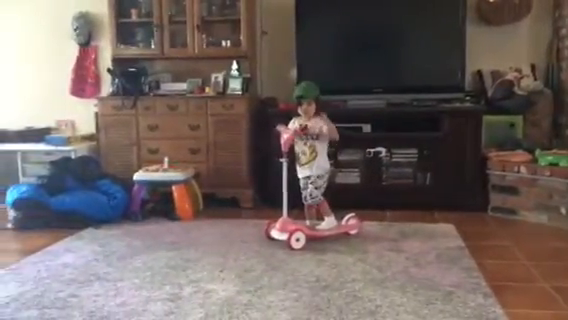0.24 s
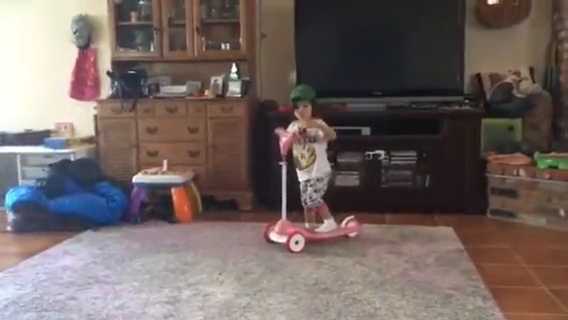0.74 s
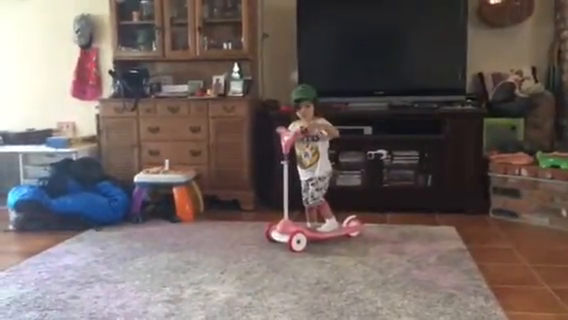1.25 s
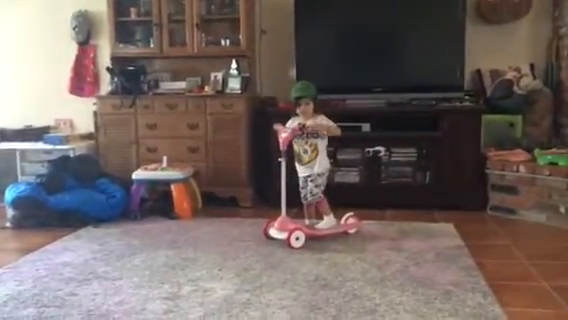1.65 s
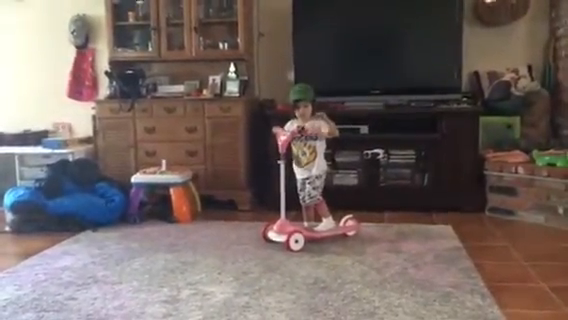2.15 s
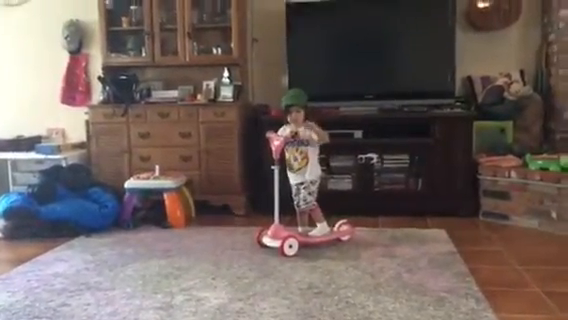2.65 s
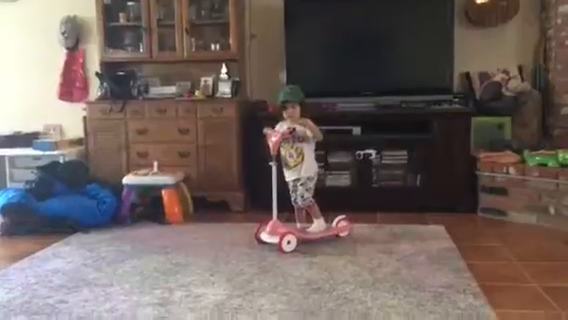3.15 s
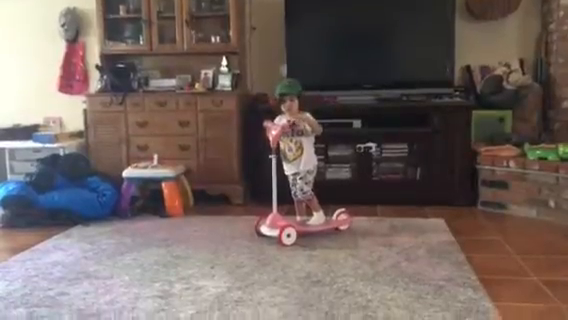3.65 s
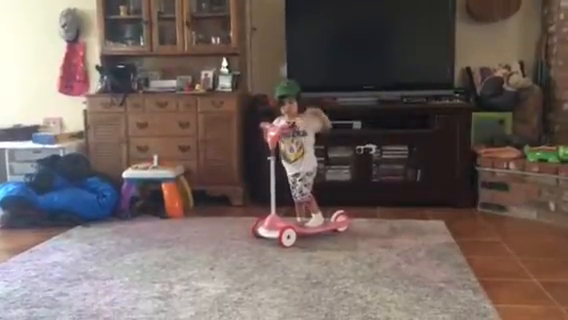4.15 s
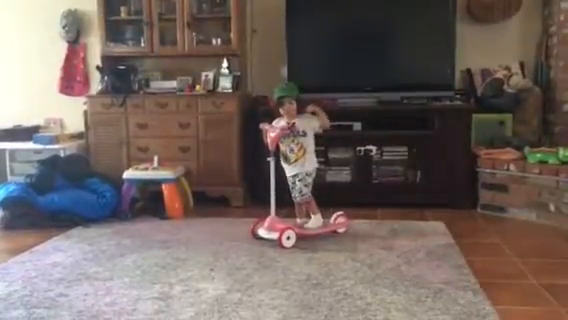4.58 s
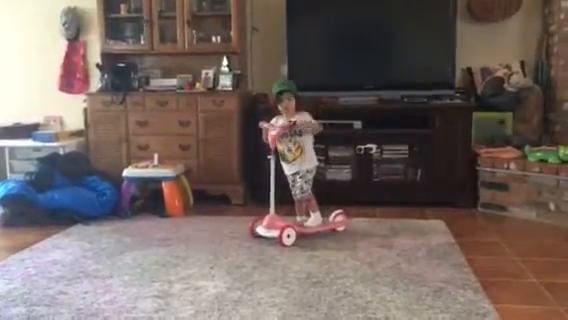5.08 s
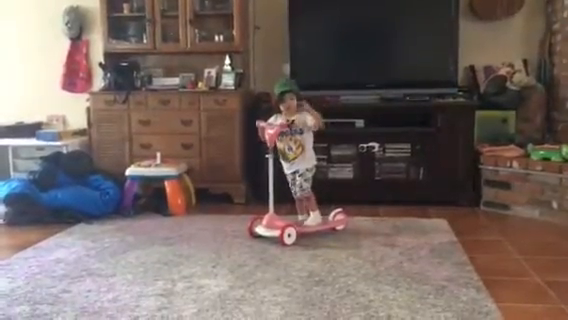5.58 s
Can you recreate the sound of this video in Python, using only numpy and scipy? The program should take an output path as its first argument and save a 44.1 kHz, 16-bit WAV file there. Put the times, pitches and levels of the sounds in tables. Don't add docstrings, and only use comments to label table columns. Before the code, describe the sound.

Two clear, high bell dings a couple of seconds apart, with lever clicks and long shimmering decay over faint room hum and hiss.

```python
import sys
import numpy as np
from scipy import signal
from scipy.io import wavfile
from scipy.ndimage import uniform_filter1d

SR = 44100
rng = np.random.default_rng(int(sys.argv[2]) if len(sys.argv) > 2 else 0)


def invert_db(x):
    u = np.asarray(x, float) / 20
    return 10 ** u


def digitize_waveform(pressure):
    field = np.atleast_2d(pressure).T
    bounded = np.clip(field, -1, 1)
    quanta = np.round(bounded * 32767).astype(np.int16)
    wavfile.write(sys.argv[1], SR, quanta)


N = 256662


def evened(x):
    return x / np.sqrt(np.mean(x ** 2) + 1e-20)


def read(points, hz):
    f, value = np.transpose(points)
    return np.interp(np.log(hz + 1), np.log(f + 1), value)


def add(mix, s, sound):
    part = mix[round(s * SR):][:len(sound)]
    part += sound[:len(part)]


def colour(points, size=1024):
    level_db = np.maximum(read(points, np.fft.rfftfreq(size, 1 / SR)), -70)
    half = np.log(invert_db(level_db))
    full = np.concatenate([half, half[-2:0:-1]])
    taps = np.fft.ifft(np.exp(np.conj(signal.hilbert(full)))).real
    return taps / np.linalg.norm(taps)


def burst(db, ms, count=16, size=2048):
    r = np.exp(-2000 / ms / SR)
    bend = -2 * r * np.cos(np.pi * rng.random(count) ** 1.6)
    one = np.ones(count)
    stages = np.column_stack([r * r * one, bend, one, one, bend, r * r * one])
    click = np.arange(size) == 0
    return 2.84 * invert_db(db) * signal.sosfilt(stages, click)


def wander(top_hz, count=24):
    t = np.arange(0, N, 64) / SR
    slow = 0
    for f in np.geomspace(.3, top_hz, count):
        slow = slow + np.sin(2 * np.pi * (f * t + rng.random())) / np.sqrt(f)
    return np.interp(np.arange(N) / SR, t, evened(slow))


def noise(points, patchy_db):
    frames, hz = N // 512 + 5, np.fft.rfftfreq(2048, 1 / SR)
    a, b, patches = rng.standard_normal((frames, 1025, 3)).T
    patches = uniform_filter1d(patches, size=12, axis=0)
    patches = evened(uniform_filter1d(patches, size=8, axis=1))
    z = (a + 1j * b) * invert_db(read(points, hz)[:, None] + patchy_db * patches)
    return evened(signal.istft(z, nperseg=2048, noverlap=1536)[1][:N])


BELL_HZ = [2438.7, 2469.0, 6261.4, 11359.6]
# mode, mode, first blow level/dB, second blow level/dB
SUMS = [(1, 1, -77.5, -72.5), (0, 1, -84, -80), (0, 2, -63, -65), (1, 2, -59.5, -57.5), (2, 2, -60, -75),
        (1, 3, -56, -58.5)]
BEAT_LEAD = [-0.051, .09]


def bell():
    t = np.arange(N) / SR
    second = t >= BLOWS[1][0]
    since = np.where(second, t - BLOWS[1][0], t - BLOWS[0][0])
    out = np.zeros(N)
    first_share = [.2, 0.22, 0.38, 0.82]
    levels = [np.interp(t, t[::8], heard(k, t[::8])) / 1.104 for k in range(len(BELL_HZ))]
    lead = np.where(second, BEAT_LEAD[1], BEAT_LEAD[0])
    echoed = 0.47 * (since > ECHOES[2][0]) + 0.67 * (since > ECHOES[3][0])
    for hz, level, share, turns in zip(BELL_HZ, levels, first_share, [-lead, 0, 0, 0]):
        fill = uniform_filter1d(share + (1 - share) * echoed, size=30)
        spin = np.exp(2j * np.pi * (hz * since + turns))
        out += np.sqrt(2) * (level * fill * spin).imag

    swing = [abs(level) / invert_db(db) for level, db in zip(levels, RINGS[0])]
    swing[2] = invert_db(-60 * np.maximum(since, 0) / FREE_T60[2])
    grip_s = 4.95
    free = (since > 0) * np.clip((grip_s - t) / .02, 0, 1)
    for a, b, first_db, second_db in SUMS:
        a, b = round(a), round(b)
        bend = invert_db(np.where(second, second_db, first_db) + 4.0 * wander(25.0))
        bend = bend * swing[a] * swing[b] * free
        out += np.sqrt(2) * bend * np.sin(2 * np.pi * (BELL_HZ[a] + BELL_HZ[b]) * since)
    return out


FREE_T60 = [4.68, 5.02, 3.21, 1.036]
# low twin level/dB, low level/dB, main level/dB, top level/dB
RINGS = [
    (-46, -42, -23, -20),
    (-44, -43, -26, -23),
]
# main level/dB, top level/dB
KNOCK_RING = (-41, -54.5)
# share, turns behind at rest, swell of the ring t/s
ARM = [(.421, 0.097, 0.0086), (1.3, -0.035, .08), (1.284, 0.051, .002), (0.26, 0.56, .0006)]
# t/s, path/mm
ARM_PATH = [
    [(1.701, 11), (2.022, -13.5), (2.418, -6.5), (2.938, 9), (3.614, 20.5), (4.072, 13)],
    [(4.081, -23), (4.154, 15), (4.244, 24.5), (4.27, 26.5), (4.338, 23), (4.468, 14.5), (4.562, 22),
     (4.838, 24.5), (5.008, 21)],
    [(5.092, 26.5), (5.144, 22.5), (5.182, 50), (5.322, 41), (5.386, 25.2), (5.472, 19.8), (5.562, 18.4),
     (5.778, 14.7)],
]
# t/s, path/mm
CHEST_PATH = [
    [(1.75, 11.8), (1.81, 31), (2.02, 44), (2.373, 34), (2.83, 23.5), (3.17, -39.5), (3.58, -21),
     (4.07, -34)],
    [(4.09, 77), (4.17, 47.4), (4.338, 51.7), (4.5, 33), (4.98, 32.0), (5.052, 23)],
    [(5.204, 83), (5.274, 87), (5.348, 64), (5.475, 62.4), (5.606, 54), (5.817, 51)],
]
# offset f/Hz, level/dB, 60 dB decay t/s
TWINS = [(-1.32, -7, 2.6), (11.4, 5, .3)]
TWIN_LEAD = [(0.85, .72), (.32, 0.36), (0.7, .5)]
# main level/dB, top level/dB
TWIN_PUSH_DB = [(0, -1.5), (0, 2), (0, -1)]
TWIN_SWELL_S = [.004, .03]
SOUND_MM_PER_S = 343000


def heard(k, t):
    starts = np.array([BLOWS[0][0], BLOWS[1][0], CLACKS[7][0]])
    ring = np.maximum(np.searchsorted(starts, t, "right") - 1, 0)
    path_mm = np.interp(t, *np.vstack(CHEST_PATH if k < 2 else ARM_PATH).T)
    if k < 2:
        ring = np.minimum(ring, 1)
    since = np.maximum(t - starts[ring], 0)
    share, turns, swell_s = ARM[k]
    copy = share * np.exp(2j * np.pi * (BELL_HZ[k] * path_mm / SOUND_MM_PER_S + turns))
    gain = invert_db(-60 * since / FREE_T60[k]) * (1 + copy)
    level_db = np.array([RINGS[0][k], RINGS[1][k], KNOCK_RING[k % 2]])[ring]
    if k >= 2:
        offset_hz, db, t60 = TWINS[k - 2]
        push_db = np.array(TWIN_PUSH_DB)[ring, k - 2]
        lead = np.array(TWIN_LEAD)[ring, k - 2]
        twin = (1 - np.exp(-since / TWIN_SWELL_S[k - 2])) * invert_db(db + push_db - 60 * since / t60)
        gain = abs(gain + twin * np.exp(2j * np.pi * (offset_hz * since + lead)))
    return invert_db(level_db) * gain * (1 - np.exp(-since / swell_s))


# t/s, crack level/dB
BLOWS = [
    (1.6831, -1.5),
    (4.0832, -4.5),
]
# f/Hz, level/dB per Hz
CRACK = [(590, -67.5), (1000, -30.5), (1700, -40.5), (2910, -22.5), (4540, -18.5), (6020, -12.5),
         (8860, -6.5), (11700, -5), (13500, -6), (16500, -31)]


def hammer():
    dry = np.zeros(N)
    for s, db in BLOWS:
        rattle = burst(db - 9.5, 2.9)
        rattle[0] = invert_db(db)
        add(dry, s, rattle)
    return signal.oaconvolve(dry, colour(CRACK))[:N]


# t/s, housing level/dB, stem level/dB, length/ms
CLACKS = [(0.0967, -59, -36.5, 1.85), (0.0973, -36.5, -53.5, 1.3), (1.6726, -27, -52, 3),
          (1.6805, -46, -50.5, 0.66), (1.684, -32.5, -37.5, 1.5), (4.0788, -42.5, -54.5, 0.92),
          (4.0851, -27, -46, 1), (5.0528, -33.5, -37.5, 1.3), (5.0626, -59, -45.5, 1.3),
          (5.07, -55, -42.5, 0.32), (5.126, -46.5, -45, 4.6), (5.145, -51, -72, 6.9)]
# f/Hz, level/dB per Hz
CLACK = [(180, -59.5), (300, -35.5), (1020, -8.5), (1550, -14), (2400, -5), (5100, -14), (9490, -14),
         (10700, -28), (11600, -14.5), (15400, -18), (16500, -36.5)]
# f/Hz, level/dB per Hz
KNOCK = [(150, -22.5), (300, 2.5), (550, 7), (1200, -8), (2000, -5.5), (5000, -12.5), (10000, 2),
         (15000, -12.5), (16500, -25.5)]


def lever():
    housing, stem = np.zeros((2, N))
    for s, housing_db, stem_db, ms in CLACKS:
        add(housing, s, burst(housing_db, ms))
        add(stem, s, burst(stem_db, ms))
    return (signal.oaconvolve(housing, colour(CLACK)) + signal.oaconvolve(stem, colour(KNOCK)))[:N]


# t/s, peak level/dB, f/Hz, length/ms
THUDS = [(.099, -46.5, 510, 15), (0.0985, -48.5, 11900, 3), (.1, -43, 2406, 12), (.101, -56, 3350, 8),
         (.431, -55, 655, 15), (1.675, -52.5, 1100, 6.3), (1.685, -31, 2364, 22), (1.686, -47, 555, 17),
         (4.086, -52, 1060, 7.4), (4.087, -28.5, 2364, 6.2), (4.088, -55, 309, 15),
         (1.688, -54.5, 300.5, 13), (4.729, -63, 1924, 28), (4.971, -57, 700, 10.4),
         (5.06, -37.5, 2380, 13), (5.15, -53, 760, 21)]
# t/s, peak level/dB, f/Hz, length/ms
TICKS = [(.070, -66, 3420, 4.4), (.98, -69, 3280, 3.1), (1.17, -58, 13000, 8), (1.212, -67.5, 3500, 2.2),
         (1.599, -63, 3330, 1.435), (2.215, -65, 4300, 4), (2.222, -60, 3500, 6), (2.231, -65.5, 1603, 3.7),
         (2.815, -62, 3680, 7.9), (2.85, -63, 3700, 23), (3.345, -63.5, 3450, 4), (3.42, -69.5, 1500, 10),
         (4.312, -55, 7500, 1.7), (4.312, -64, 3600, 2), (4.351, -56, 4280, 4), (4.352, -53.5, 8000, 2.7),
         (5.143, -57.5, 4340, 8), (5.269, -65, 3500, 3), (5.276, -51, 4370, 5), (5.301, -67, 4300, 4),
         (5.51, -54.5, 11300, 4)]


def thuds_and_ticks():
    near, far = np.zeros((2, N))
    rows = [(*row, 364, 0.94) for row in THUDS]
    rows += [(*row, .16 * row[2], .06 + .025 * row[3]) for row in TICKS]
    for s, db, hz, ms, width_hz, wet in rows:
        b, a = signal.iirpeak(min(hz, 15000), max(hz / width_hz, .7), SR)
        puff = signal.lfilter(b, a, burst(0, ms))
        puff = signal.lfilter(b, a, puff)
        puff *= invert_db(db) / abs(puff).max()
        wet = min(wet, 1)
        add(near, s, (1 - wet) * puff)
        add(far, s, wet * puff)
    return near, far


# t/s, level/dB
RUSTLE = [
    (1.75, -77),
    (1.9, -78),
    (2.05, -70.5),
    (2.19, -72.5),
    (2.21, -108.5),
]
# f/Hz, level/dB per Hz
CLOTH = [(300, -23.5), (700, 3), (2000, -2), (4500, -1), (7000, -14.5)]


def sleeve():
    s, db = np.transpose(RUSTLE)
    level_db = np.interp(np.arange(N) / SR, s, db, left=-140, right=-140)
    return invert_db(level_db) * noise(CLOTH, patchy_db=0.5)


# delay t/s, gain
ECHOES = [(.0023, .12), (.0048, -.12), (.0080, .4), (.0128, .2), (.0165, -.12), (.022, .1), (.0335, .15)]
# f/Hz, t/s
ROOM_T60 = [(200, 0.52), (600, 0.55), (1500, 0.45), (2500, 0.4), (5000, .4), (10000, 0.22), (16000, 0.095)]


def room(x):
    taps = np.zeros(SR // 2 * 2)
    at = np.arange(300, len(taps) - 20, 6)
    taps[at + rng.integers(0, 6, len(at))] = rng.choice([-1., 1.], len(at))
    hz, t, z = signal.stft(taps, SR, nperseg=256)
    z = z * invert_db(-60 * t / read(ROOM_T60, hz)[:, None])
    tail = signal.istft(z, SR, nperseg=256)[1]
    tail *= 1 - np.exp(-np.arange(len(tail)) / (0.0013 * SR))
    tail = invert_db(-1.5) * tail / np.linalg.norm(tail)
    tail[0] = 1
    for delay, gain in ECHOES:
        tail[round(delay * SR)] += gain
    return signal.fftconvolve(x, tail)[:N]


# f/Hz, level/dB
HUM = [(59.2, -70.5), (118.4, -74), (172.3, -73.5), (258.4, -80), (296.1, -78.5), (355.3, -81.5),
       (414.5, -87)]
# f/Hz, level/dB per Hz
RUMBLE = [(12, -42), (20, -5), (89, 0), (178, -10), (216, -11.5), (291, -12), (700, -22), (910, -48),
          (1540, -120)]
# f/Hz, level/dB per Hz
HISS = [(300, -12.5), (700, -3), (1800, -10), (2700, -10.5), (4900, -14), (5700, -12.5), (8000, -13.5),
        (10500, -14.5), (11500, -12.5), (13200, -10), (15750, -10.5), (15950, -46)]


def air():
    t = np.arange(N) / SR
    hum = np.zeros(N)
    for f, db in HUM:
        level = invert_db(db + 1.0 * wander(8.2))
        hum += level * np.sin(2 * np.pi * f * t + 0.72 * wander(14.0))
    rumble = invert_db(-64.5) * noise(RUMBLE, patchy_db=0.2)
    hiss = invert_db(-73.5) * noise(HISS, patchy_db=2.5)
    return rumble + hiss + np.sqrt(2) * hum


def hide(x, size=16):
    margin_db, slack_db = 24.5, 3.5
    up_db, down_db = 11, 14
    growth, pivot_db = 0.41, -52
    hz, t, z = signal.stft(x, SR, nperseg=2048, noverlap=1536)
    power = abs(z[:1024].reshape(1024 // size, size, -1)) ** 2
    band_db = 10 * np.log10(power.sum(axis=1) + 1e-16)
    line_db = 10 * np.log10(power.max(axis=1) + 1e-16) + 9.4
    mid_hz = hz[size // 2:1024:size]
    ear = 26.8 * mid_hz / (1960 + mid_hz)
    apart = ear[:, None] - ear[None]
    spread_db = np.where(apart > 0, up_db * apart, -down_db * apart)
    felt_db = np.minimum(band_db, pivot_db + growth * (band_db - pivot_db))
    mask_db = (felt_db[None] - spread_db[:, :, None]).max(axis=1) - margin_db
    mask_db -= 5.5 * np.clip((mid_hz[:, None] - 11500) / 3000, 0, 1)
    slack = slack_db * rng.standard_normal((len(t), 1)) + 1.0 * rng.standard_normal(mask_db.T.shape)
    mask_db += np.repeat(slack[::2], 2, axis=0)[:len(t)].T
    kept = (np.maximum(band_db, line_db) > mask_db) | (mid_hz < 2600)[:, None]
    z[:1024] *= np.repeat(kept, size, axis=0)
    return signal.istft(z, SR, nperseg=2048, noverlap=1536)[1][:N]


def scene():
    near, far = thuds_and_ticks()
    knocks = room(hammer() + lever() + far)
    return (bell() + knocks + near + sleeve() + air())[None]


def roll_off(x):
    return signal.sosfilt(signal.butter(12, 16650, fs=SR, output="sos"), x)


def record(dry):
    x = signal.sosfilt(signal.butter(2, 36, "high", fs=SR, output="sos"), dry[0])
    mix = hide(x)[None]
    return roll_off(mix)


dry = scene()
out = record(dry)
digitize_waveform(out)
```